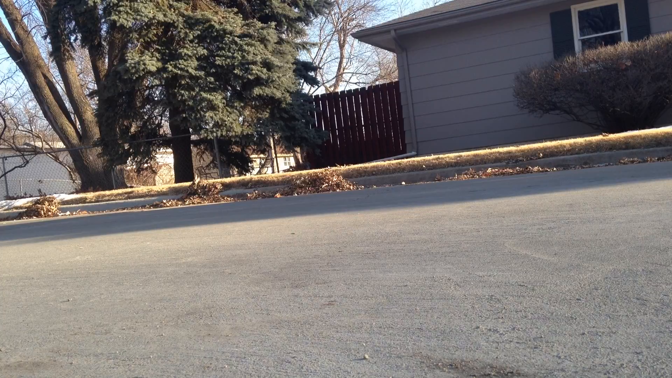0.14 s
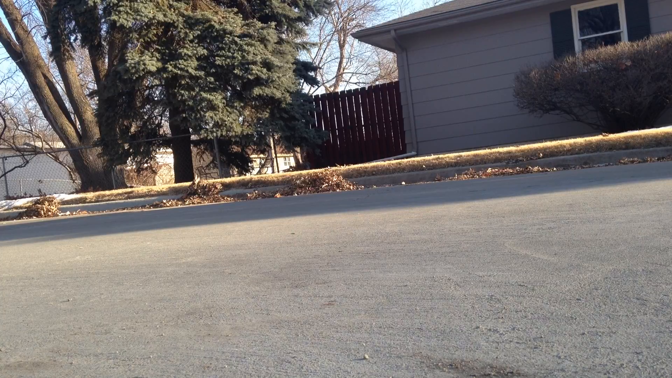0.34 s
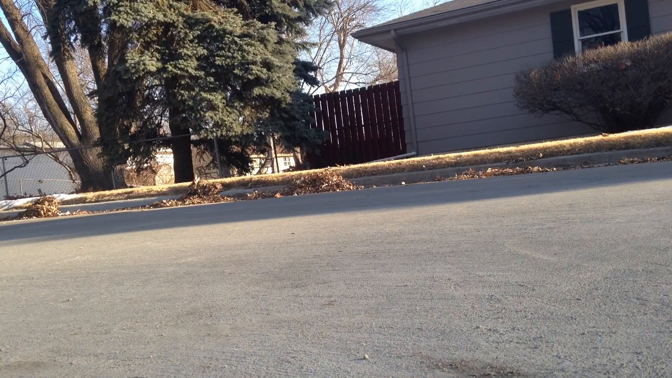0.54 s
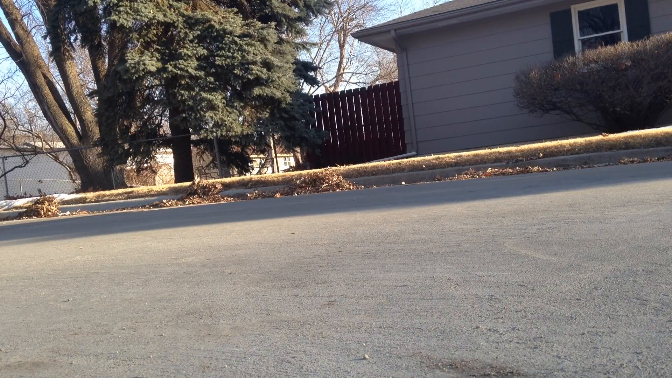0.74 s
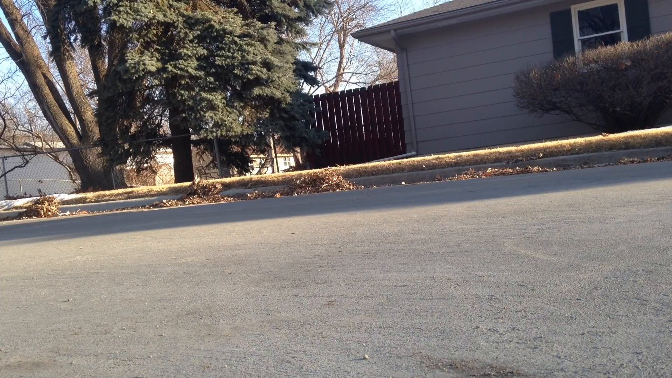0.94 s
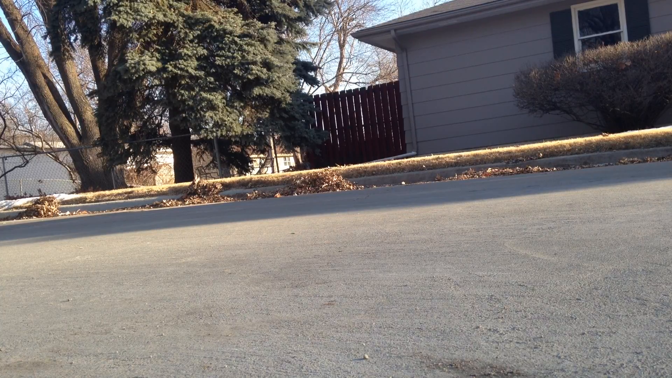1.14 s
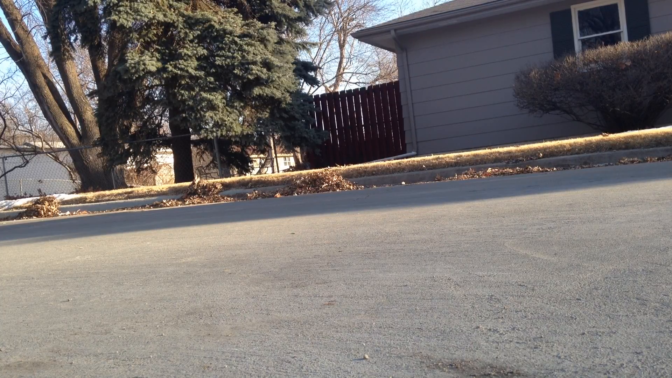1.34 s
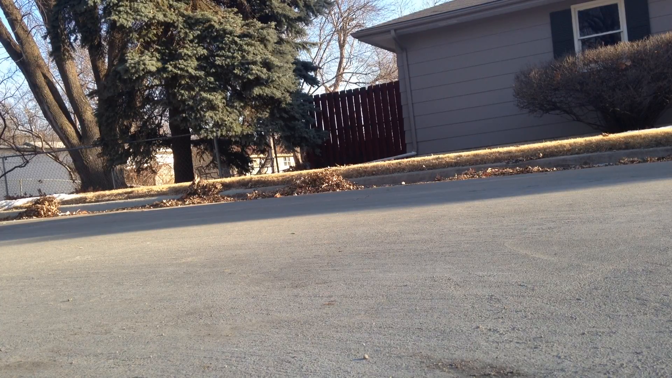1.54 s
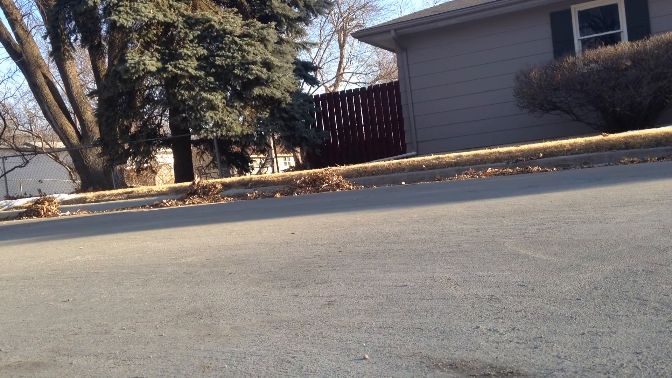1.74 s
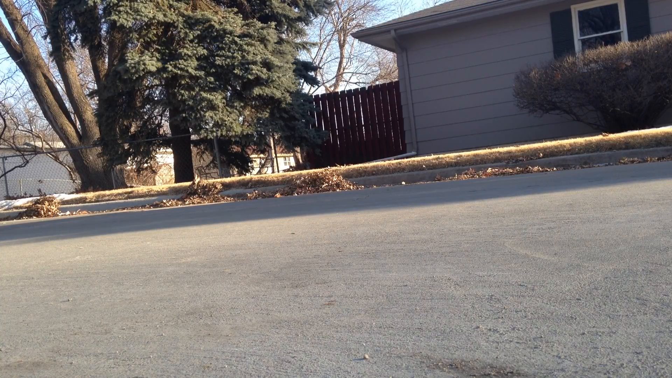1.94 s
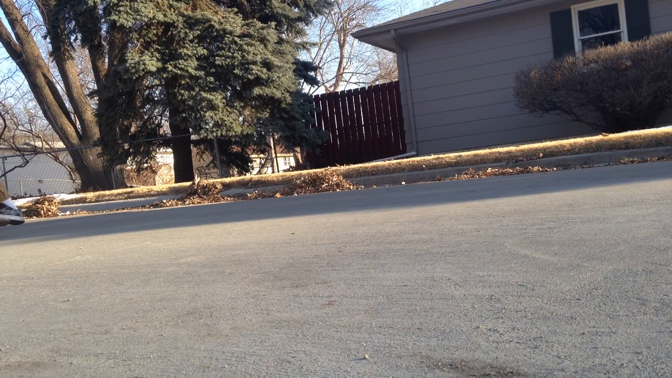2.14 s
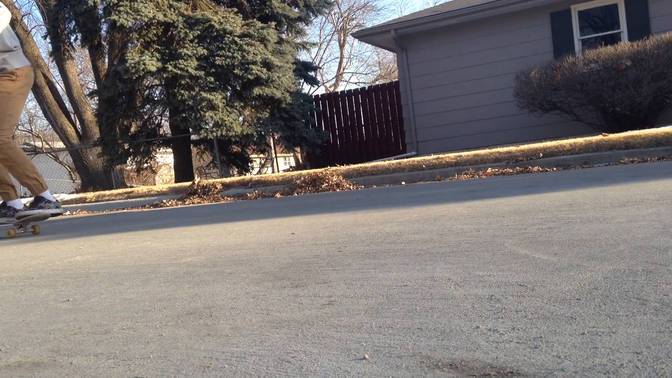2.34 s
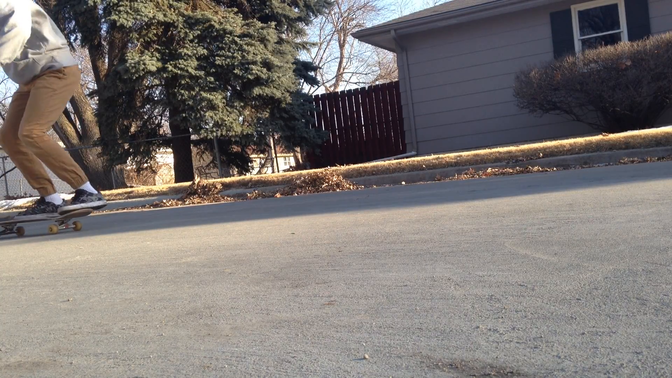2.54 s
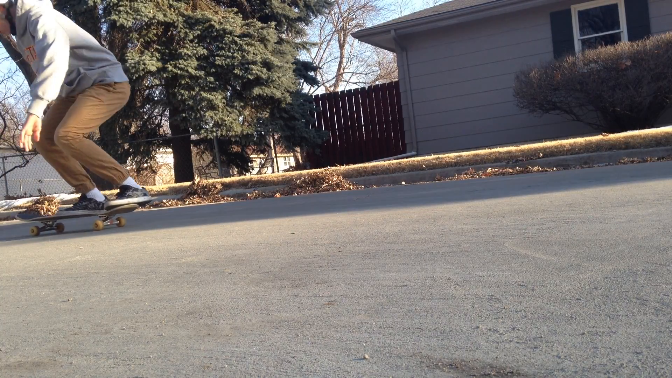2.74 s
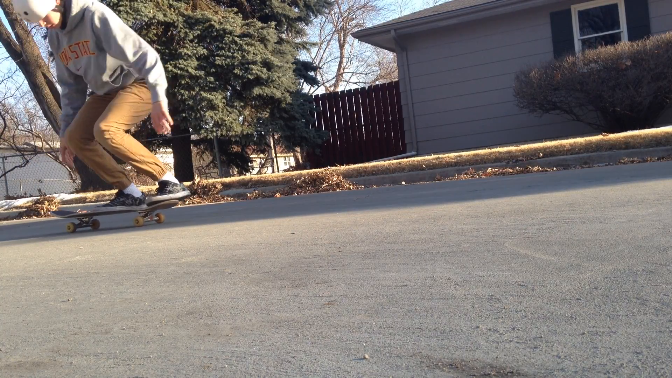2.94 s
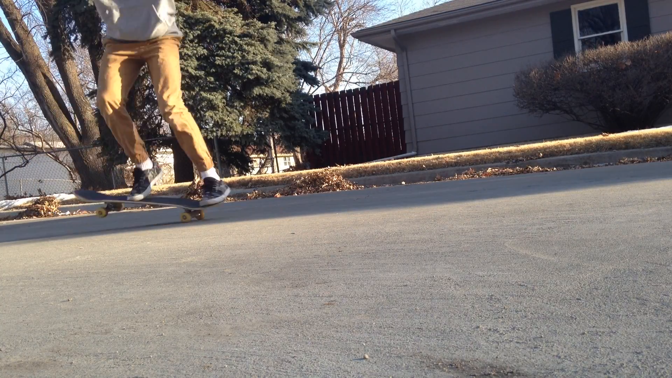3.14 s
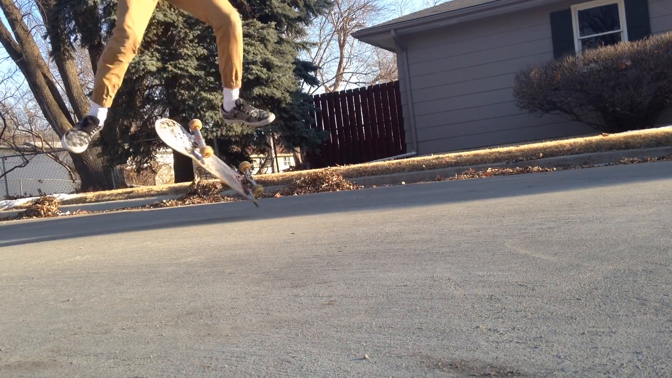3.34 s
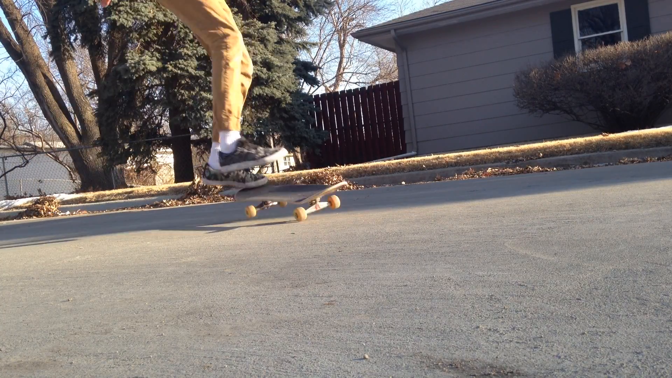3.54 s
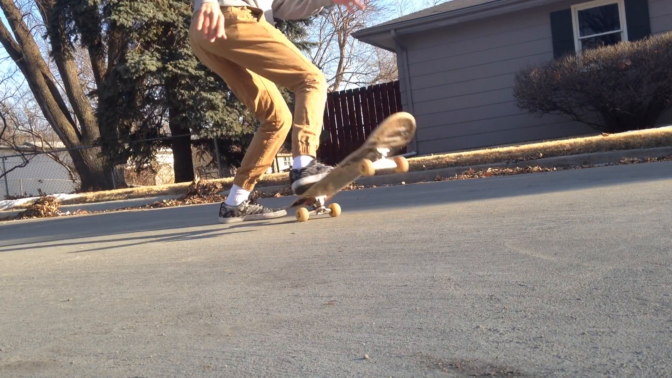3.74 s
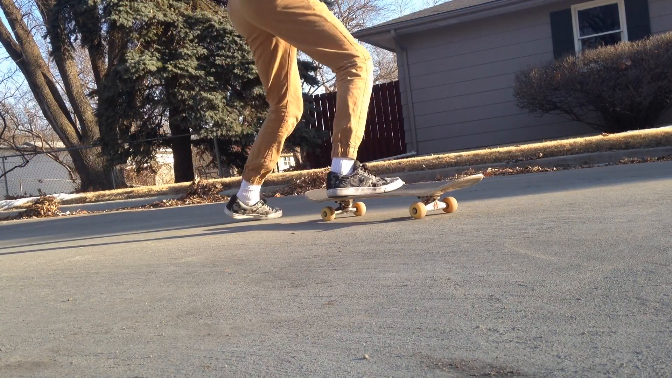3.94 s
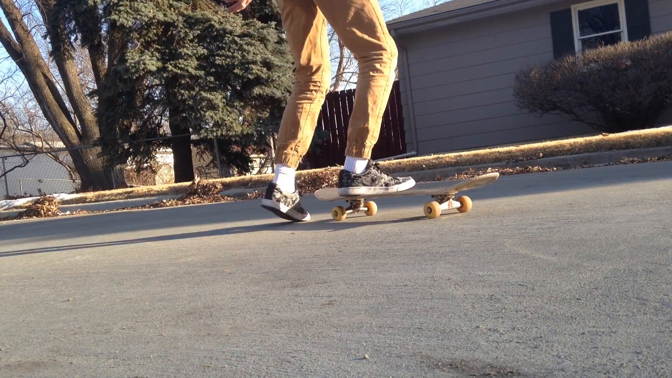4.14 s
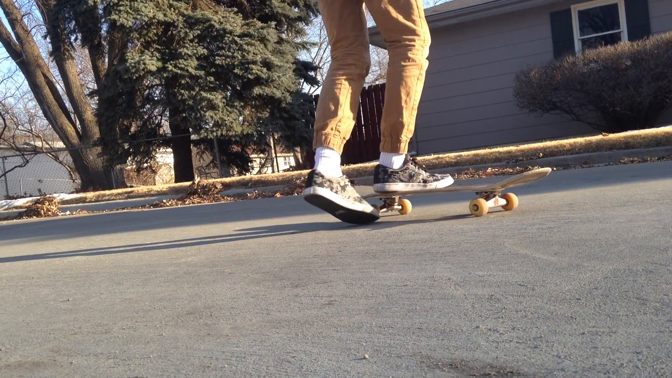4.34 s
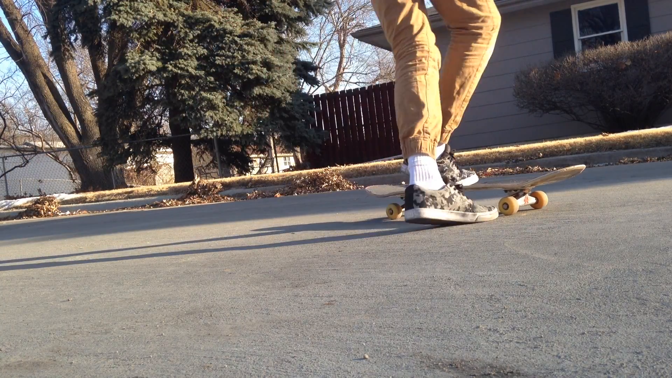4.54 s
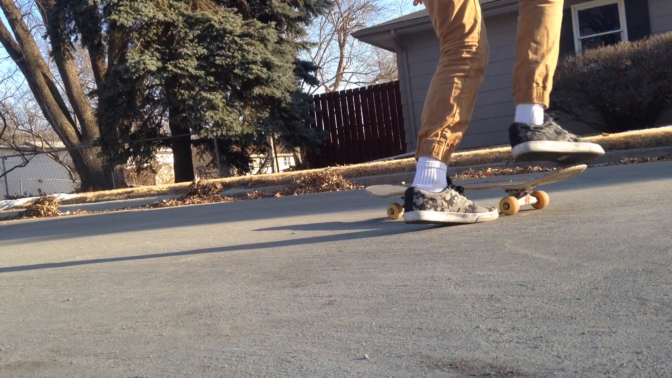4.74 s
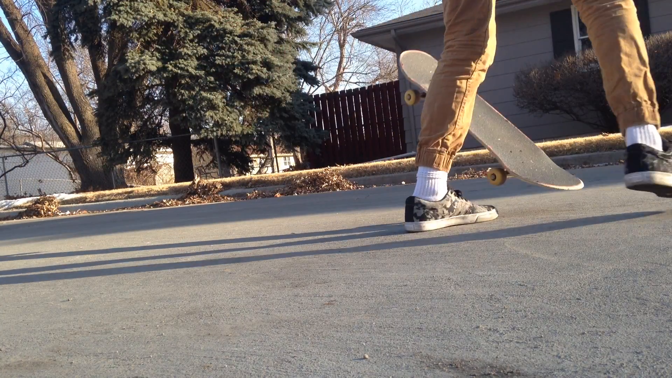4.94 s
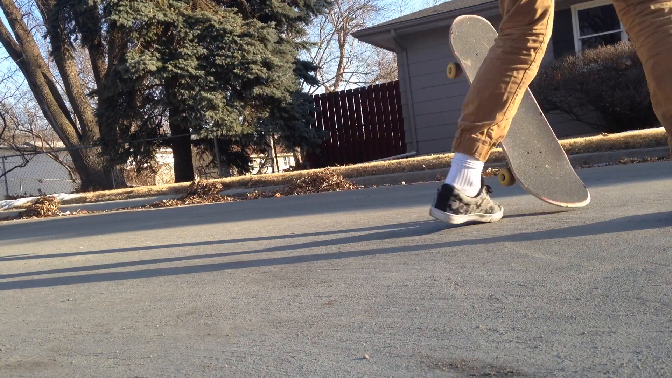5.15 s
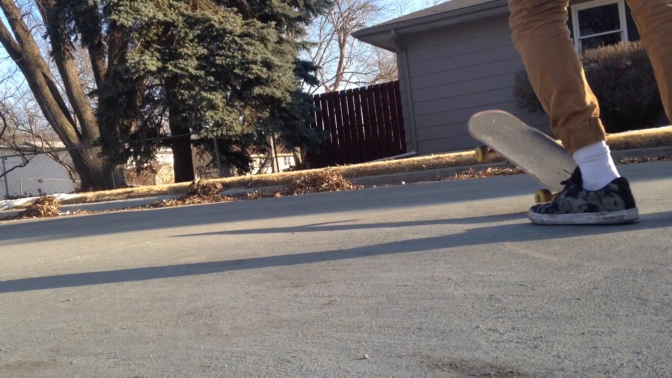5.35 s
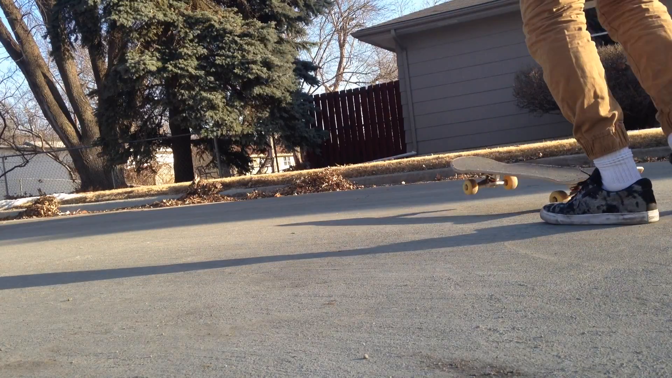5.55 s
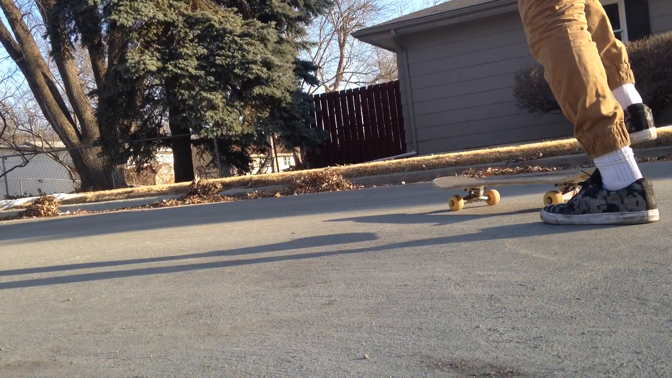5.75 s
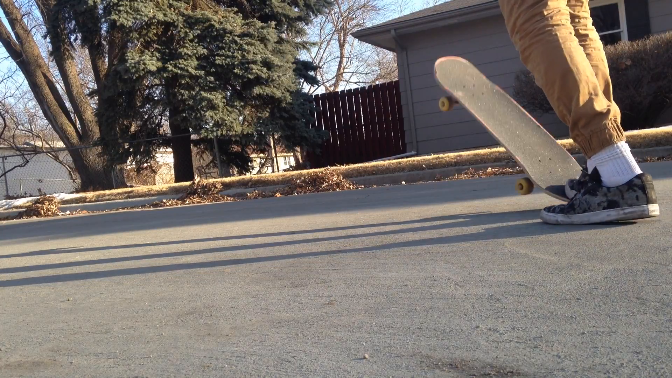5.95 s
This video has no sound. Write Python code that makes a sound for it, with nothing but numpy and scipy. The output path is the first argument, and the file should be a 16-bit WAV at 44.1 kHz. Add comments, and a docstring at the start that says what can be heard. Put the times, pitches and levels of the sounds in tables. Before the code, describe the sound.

A quiet street with low distant traffic hum and faint air. At 0-0.5 s, soft wheel roll and shoes scuffing grit. From 0.5 to 1.1 s a skateboard's wooden tail drags harshly, with small knocks inside the scrape. Light scuffs and a dull knock around 1.5 s; at 1.94 s a firm hollow clack, then gentle rolling with gritty ticks, snapping brighter near 3 s. At 3.3 s a sharp double pop and scrape, a short gap, then very loud, cracking slaps at 3.6 and 3.85 s with metallic truck rattle and skidding. From 4 to 4.8 s it is much quieter: a sole slides with a rising hiss, grit snaps. At 4.82 and 4.94 s clacks resume, then strong irregular wooden hits and scrapes at 5.2, 5.4-5.5, 5.7 and 6 s, still scraping at the end. Faint short house echo; the loudest blows overload the close microphone.

```python
"""First comes the far hum of a quiet street, with a soft roll of wheels and shoes scuffing on grit.
Then a skateboard's tail is dragged; the board rolls in, pops, lands and is kicked about on asphalt.
Blows and scrapes ring the wooden deck and shake the metal trucks, while rolling drums its low tones.
Grit hisses and snaps, house fronts answer faintly, and the loudest blows overload the microphone."""
import sys
import numpy as np
from scipy import signal
from scipy.fft import rfft, irfft, next_fast_len
from scipy.io import wavfile
from scipy.ndimage import uniform_filter1d, map_coordinates

SR = 44100
rng = np.random.default_rng(int(sys.argv[2]) if len(sys.argv) > 2 else 0)


def digitize_waveform(pressure):
    """Quantize a signal to 16-bit integers and store it at the path in sys.argv[1].

    Rows of a 2-D input are taken as channels; values are limited to [-1, 1].
    """
    field = np.atleast_2d(pressure).T
    bounded = np.clip(field, -1, 1)
    quanta = np.round(bounded * 32767).astype(np.int16)
    wavfile.write(sys.argv[1], SR, quanta)


def boost_factor(decibels):
    """Convert a level in decibels to a linear amplitude factor."""
    exponent = np.asarray(decibels, float) / 20
    return 10 ** exponent


N = 268128
STEPS = np.arange(0, N / SR + .01, .001)  # times at which slow level and pitch curves are worked out [s]
SKID_RISE_S = 0.012036  # time a skid takes to swell by 20 dB


def unit(x):
    """Scales a sound to an average strength (rms) of 1."""
    return x / np.sqrt(np.mean(x ** 2) + 1e-20)


def along(points, hz):
    """Reads values between (frequency, value) points on a log frequency axis."""
    f, v = np.transpose(points)
    return np.interp(np.log(hz + 1), np.log(f + 1), v)


def curves(rows):
    """Draws one curve over STEPS for each column after the time."""
    s, *columns = np.transpose(rows)
    return [np.interp(STEPS, s, column) for column in columns]


def sampled(control):
    """Reads a slow curve at every sound sample."""
    return np.interp(np.arange(N) / SR, STEPS, control)


def wobble(rate):
    """Makes a smooth random curve with the given number of random points a second."""
    knots = rng.standard_normal(int(N * rate / SR) + 4)
    return map_coordinates(knots, [np.arange(N) * rate / SR])


def filtered(x, response):
    """Multiplies the frequencies of a sound by a complex response."""
    m = next_fast_len(x.shape[-1] + 8192)
    spectrum = rfft(x, m) * response(np.fft.rfftfreq(m, 1 / SR))
    return irfft(spectrum, m)[..., :x.shape[-1]]


def coloured(x, spectrum):
    """Shapes a sound with a (frequency, level) spectrum and scales it to rms 1."""
    return unit(filtered(x, lambda hz: boost_factor(along(spectrum, hz))))


def modes(table):
    """Lets each mode (a tone a body rings at) answer a push, neighbours in opposite phase."""
    centre, width, db = np.transpose(table)[:, :, None]
    sign = (-1.) ** np.arange(len(table))[:, None]
    return lambda f: sign * boost_factor(db) * 1j * f * width / (centre * centre - f * f + 1j * f * width)


def grains(rate, spread_db, smooth):
    """Stones met at random moments, a few of them larger, on a share of smooth rubbing noise."""
    met = rng.random(N) < rate / SR
    size_db = spread_db * np.minimum(rng.exponential(size=N), 2.5)
    hits = met * boost_factor(size_db) * rng.uniform(-0.9581, 1, N)
    return unit(hits) + smooth * rng.standard_normal(N)


def patchy(x, depth_db):
    """The colour shifts in random patches of time and pitch as the contact changes."""
    z = signal.stft(x, nperseg=256)[2]
    field = uniform_filter1d(rng.standard_normal(z.shape), 6, 0)  # smooth over pitch
    field = uniform_filter1d(field, 14, 1)  # smooth over time
    return unit(signal.istft(z * boost_factor(depth_db * unit(field)), nperseg=256)[1][:N])


def stroke(s, db, rise_s, fall_s):
    """Level in dB of one sound that swells to a peak and dies away, 20 dB in each given time."""
    late = STEPS - s
    return db - 20 * np.where(late < 0, -late / abs(rise_s), late / abs(fall_s))


def together(parts):
    """Joint gain of (level, pitch) parts, and their pitch, led by the loudest."""
    power = [boost_factor(2 * db) for db, hz in parts]
    total = sum(power) + 1e-20
    pitch = sum(p * hz for p, (db, hz) in zip(power, parts)) / total
    return sampled(np.sqrt(total)), sampled(pitch)


# far hum before its random swell: (time [s], level [dB])
STREET = [(0.0, -39.5), (0.49, -41), (0.8, -37.5), (1.57, -42), (1.81, -40), (3.12, -41.5), (3.57, -39),
          (3.71, -40), (3.88, -61.5), (4.11, -51), (5.3, -44.5), (6.08, -41.5)]
# colour of the far traffic: (frequency [Hz], relative level [dB])
HUM = [(15, -59), (25, -22), (56, -7.5), (129, -0.5), (248, -5.5), (375, -25.5), (425, -41.5), (500, -39.5),
       (650, -53.5), (1100, -120)]
# colour of the still air: (frequency [Hz], relative level [dB])
AIR = [(180, -36), (300, -1), (674, 1.5), (745, 0.5), (893, -6.5), (2570, -21.5), (14100, -30),
       (15600, -27.5)]


def street():
    """Distant traffic is low noise that swells slowly; the still air is a steady, fainter noise."""
    swell_db = 1.3 * wobble(8)
    hum = boost_factor(sampled(curves(STREET)[0]) + swell_db) * coloured(rng.standard_normal(N), HUM)
    air = boost_factor(-51) * coloured(rng.standard_normal(N), AIR)
    return hum + air


# wheels rolling on the road: (time [s], level [dB])
RIDE = [(0.0, -45.5), (0.5, -44), (0.72, -35), (0.9, -39), (1.05, -32), (1.13, -48.5), (1.92, -49),
        (1.99, -38), (2.126, -43.5), (2.524, -40.5), (2.724, -35.5), (2.93, -43.5), (3.1, -47),
        (3.25, -40.5), (3.5, -51.5), (4.0, -58.5), (4.36, -53), (4.81, -71), (6.08, -62.5)]
# a foot weighs on the deck and drums it; the signs of the two durations are ignored:
# (peak time [s], level [dB], time to rise 20 dB [s], time to fall 20 dB [s])
STOMPS = [(3.305, -24, 0.0473, 0.2005), (3.79, -25.5, 0.1945, 0.0729), (3.938, -29, -0.0109, 0.0117),
          (5.78, -46.5, -0.0078, -0.0068)]


def drumming():
    """Wheels, skids and feet together set how strongly the deck bends."""
    # the low drumming of a skid is 6.5 dB under its scrape and lasts a little longer
    skids = [stroke(s, db - 6.5, SKID_RISE_S, 1.1737 * fall) for s, db, fall, hz, hiss_db in SKIDS]
    stomps = [stroke(*row) for row in STOMPS]
    return sampled(np.sqrt(sum(boost_factor(2 * db) for db in curves(RIDE) + skids + stomps)))


def ridden(db, follows, hz):
    """A background contact: its level at a -45 dB ride, the dB gained per dB of ride, its pitch."""
    return db + follows * (curves(RIDE)[0] + 45), hz


# tones the free wooden deck rings at: (frequency [Hz], width [Hz], relative level [dB])
DECK = [(224.26, 89.24, -8), (322.34, 37.205, 1), (499.08, 102.4, -1), (767.03, 145.06, 3),
        (958.5, 161.45, 1.5), (1070, 59.785, 4), (1230, 177.31, -0.5), (1499.1, 136.38, 3),
        (1710, 104.1, 4.5), (1886, 143.69, 4.5), (2180.5, 410.66, -1), (2970, 930, -16)]
BEND_HZ = 620  # modes below this bend the whole deck


def roll():
    """The coarse road shakes the soft wheels, which drum the bending modes of the loaded deck."""
    # the load damps the deck: wider modes die sooner
    damped = [(hz, 2.0 * width, db) for hz, width, db in DECK if hz < BEND_HZ]
    stones = grains(500, spread_db=7.5, smooth=1.0017)
    soft = filtered(stones, lambda hz: 1 / (1 + 1j * hz / 900) ** 2)  # soft wheels pass little treble
    lumps_db = 1.8 * wobble(18)
    return drumming() * boost_factor(lumps_db) * unit(filtered(soft, modes(damped)).sum(0))


# soles scuffing on grit; the signs of the two durations are ignored:
# (peak time [s], level [dB], time to rise 20 dB [s], time to fall 20 dB [s], strongest pitch [Hz])
SCUFFS = [(0.044, -50.5, -2.1078, 0.156, 4174), (0.222, -55.5, -1.3251, 1.0091, 4810),
          (1.02, -42.5, 0.5454, 0.0638, 4980), (1.226, -49.5, 0.2715, 0.6084, 5252),
          (1.382, -52.5, 1.09, 0.6593, 3546), (1.72, -48, 0.1232, -0.2946, 5473),
          (1.914, -36, 0.0442, 0.0982, 3568), (2.0, -44, 0.0957, 0.1775, 4947),
          (2.16, -47, 0.278, 0.3331, 5383), (2.51, -48.5, 0.198, 0.1342, 4632),
          (2.74, -46, 0.1582, 0.1835, 4298), (3.15, -41.5, 0.0476, 0.2372, 4669),
          (3.21, -35.5, 0.084, 0.0336, 5074), (3.25, -42, 0.0385, 0.0802, 6015),
          (3.311, -27, -0.0058, 0.0901, 5036), (3.723, -19.5, -0.0063, -0.0293, 3264),
          (4.057, -45, 0.1007, -0.2089, 7541), (4.54, -52, 0.14, 0.1943, 4499),
          (4.995, -37.5, 0.0998, -0.0814, 3305), (5.3, -49, 0.235, 0.7122, 3903),
          (5.438, -34.5, 0.087, 0.1614, 4604), (5.96, -50, -0.3266, -1.2, 3797),
          (6.028, -40.5, 0.1418, -2.0369, 4282), (6.075, -47, -0.0222, -0.54, 3500)]
# one sole slides slowly along the road: (time [s], level [dB], strongest pitch [Hz])
SLIDE = [(4.04, -89, 3400), (4.095, -50, 3400), (4.17, -46.5, 3926), (4.24, -41, 5113), (4.3, -43.5, 6452),
         (4.35, -50.5, 7540), (4.435, -56, 7495), (4.455, -69.5, 7500), (4.5, -90.5, 6500)]


def hiss_parts():
    """Soles, rolling and the dragged tail hiss on grit; skids add rattling metal, blows faint lead-ins."""
    rolling = ridden(-61.5, 0.45, 4497)
    drag = curves(DRAG)[0] - 22.5, 4000  # hiss under the scrape of the tail [dB], its pitch [Hz]
    # skids add a dull hiss of rattling wheels and trucks
    skids = [(stroke(s, db + hiss_db, SKID_RISE_S, fall), 3735) for s, db, fall, hz, hiss_db in SKIDS]
    # a faint hiss swells just before each blow, 45 dB under it
    lead_ins = [(stroke(s, db - 45, .015, SKID_RISE_S), 3700) for s, db, *_ in BLOWS]
    scuffs = [(stroke(*row[:4]), row[4]) for row in SCUFFS]
    return [rolling, drag, curves(SLIDE)] + skids + lead_ins + scuffs


# colour of the hiss before its moving pitch shapes it: (frequency [Hz], relative level [dB])
GRIT = [(1290, -25.5), (2200, -1), (3540, -0.5), (4310, -9.5), (4670, -6.5), (5160, -9.5), (6490, -1.5),
        (14700, -11), (15600, -17.5)]


def scuff():
    """Rubber slides over fine grit: a crackling hiss, strongest at the pitch of the gap under the sole."""
    loud, gap_hz = together(hiss_parts())
    grit = grains(2500, spread_db=3, smooth=.8) * boost_factor(1.6 * wobble(60))
    hiss = patchy(coloured(grit, GRIT), depth_db=1.3)
    hz, t, z = signal.stft(hiss, SR, nperseg=256)
    octaves = np.log2((hz[:, None] + 1) / np.interp(t, np.arange(N) / SR, gap_hz))
    gain = .8 + np.exp(-(octaves / .3) ** 2)
    gain /= np.sqrt(1 + (2 ** octaves / 2.822) ** 4)  # duller above 2.822 times the gap's pitch
    level = np.sqrt(np.mean(np.abs(z) ** 2, axis=1, keepdims=True))
    # the gap colours the hiss, not its loudness
    gain /= np.linalg.norm(gain * level, axis=0) / np.linalg.norm(level)
    return loud * signal.istft(z * gain, SR, nperseg=256)[1][:N]


# short scrapes of wood; the signs of the two durations are ignored:
# (peak time [s], level [dB], time to rise 20 dB [s], time to fall 20 dB [s], centre pitch [Hz])
SCRAPES = [(0.246, -40.5, 0.2934, 0.4125, 1179), (0.51, -46, 0.04, 0.3734, 1158),
           (1.336, -38, 0.2603, 0.2458, 1277), (1.74, -46, 0.3447, 0.0275, 886.6),
           (1.93, -33.5, 0.0898, 0.1551, 1255), (2.07, -44, 0.1331, 0.6821, 888.8),
           (3.19, -40.5, -0.0456, 0.1905, 786), (3.392, -19.5, 0.1089, 0.0288, 973),
           (3.454, -22, 0.035, 0.065, 1377), (3.722, -21, -0.0452, 0.0661, 1064),
           (3.931, -23, -0.0367, 0.0352, 1048), (6.034, -22, -0.0217, -0.2195, 1262)]
# the long drag of the tail: (time [s], level [dB], centre of the excited modes [Hz])
DRAG = [(0.5, -76.5, 1500), (0.538, -31.5, 1367), (0.638, -34, 1554), (0.65, -30, 1705), (0.69, -29, 1591),
        (0.808, -19.5, 1070), (0.845, -32, 1215), (0.968, -24.5, 1202), (1.026, -23.5, 1230),
        (1.12, -56.5, 1270), (1.18, -91.5, 1270)]
# the board skids on after a blow; the sign of the duration is ignored:
# (peak time [s], level [dB], time to fall 20 dB [s], centre pitch [Hz], hiss level over the scrape [dB])
SKIDS = [(3.31, -19.5, 0.1322, 937, -16.5), (3.644, -24.5, 0.0814, 1010, -5.5),
         (3.739, -34.5, 0.1602, 1025, -12.5), (3.87, -43.5, 0.1854, 1058, 1),
         (4.834, -42, 0.272, 1190, -19.5), (4.95, -22.5, 0.1365, 1272, -13.5),
         (5.05, -31.5, 0.108, 1027, -10.5), (5.209, -17, 0.2015, 1220, -25), (5.4, -25, 0.1631, 1260, -11),
         (5.51, -33, 0.3355, 1156, -6.5), (5.63, -34, 0.1154, 1357, -2.5), (5.714, -28.5, 0.0805, 1476, -4),
         (5.79, -28.5, 0.1133, 1337, -11), (5.905, -39.5, -0.0189, 1330, -10),
         (5.994, -25.5, 0.1516, 1266, -13.5), (6.049, -26, 0.2273, 1230, -26)]


def wood_parts():
    """Rattling rolls, the dragged tail, skids, short scrapes and faint lead-ins to blows sound the wood."""
    rattle = ridden(-51, 0.3066, 901)
    skids = [(stroke(s, db, SKID_RISE_S, fall), hz) for s, db, fall, hz, hiss_db in SKIDS]
    # a faint woody noise swells just before each blow, 33.5 dB under it
    lead_ins = [(stroke(s, db - 33.5, .015, SKID_RISE_S), hz) for s, db, hz, *_ in BLOWS]
    scrapes = [(stroke(*row[:4]), row[4]) for row in SCRAPES]
    return [rattle, curves(DRAG)] + skids + lead_ins + scrapes


def favoured(centre_hz, rest, octaves):
    """The place of contact favours the deck modes around one pitch."""
    return rest + np.exp(-(np.log2(np.array(DECK)[:, :1] / centre_hz) / octaves) ** 2)


def scrape():
    """Stones pluck the upper deck modes, a little in clumps, and shake the trucks."""
    level, centre_hz = together(wood_parts())
    stones = grains(800, spread_db=4, smooth=.75) * boost_factor(1.4 * wobble(80))
    weight = favoured(centre_hz, .42, .4) * (np.array(DECK)[:, :1] > BEND_HZ)
    weight /= np.sqrt(np.mean(weight ** 2, axis=0))
    wood = unit((filtered(stones, modes(DECK)) * weight).sum(0))
    metal = unit(filtered(stones, modes(TRUCKS[1:4])).sum(0))
    return level * (wood + boost_factor(-25.5) * metal)


# grit snapping under wheel or sole: (time [s], peak level [dB], pitch [Hz])
SNAPS = [(0.467, -38.5, 2474), (0.4958, -30.5, 1885), (1.426, -35, 2675), (1.7485, -30.5, 2730),
         (2.093, -28.5, 2891), (2.117, -32.5, 6990), (2.128, -33, 4995), (2.233, -40.5, 8015),
         (2.844, -35.5, 2822), (2.9064, -30.5, 10140), (2.965, -19, 4285), (3, -22, 4000),
         (3.037, -31.5, 4982), (3.049, -27, 4761), (3.0665, -25.5, 3779), (3.1417, -32, 4810),
         (3.244, -38, 7780), (3.2622, -34.5, 3842), (3.661, -9.5, 3208), (3.6907, -20.5, 3650),
         (3.7677, -33.5, 2500), (3.964, -33, 3480), (3.9858, -31, 7000), (3.9962, -30, 7820),
         (4.3936, -23.5, 5880), (4.407, -21, 8390), (4.5124, -37, 3625), (4.8452, -31, 5626),
         (4.8956, -27.5, 4284), (5.086, -31, 8966), (5.647, -26.5, 3413), (5.8267, -25, 3165),
         (5.9175, -27.5, 5283)]


def snaps():
    """Each grain of grit breaks with a burst of a few milliseconds around its own pitch."""
    out, t = np.zeros(N + SR), np.arange(SR // 40) / SR
    for s, db, hz in SNAPS:
        burst = rng.standard_normal(len(t)) * np.exp(-t / 0.0019543)
        tones = [(hz, 0.5654 * hz, 0), (0.9103 * hz, 1.3797 * hz, -8)]
        snap = filtered(burst, modes(tones)).sum(0)
        out[round(s * SR):][:len(t)] += boost_factor(db) * snap / np.abs(snap).max()
    return out[:N]


# tones of the metal trucks (wheel axles): (frequency [Hz], width [Hz], relative level [dB])
TRUCKS = [(3068.6, 390, 2.5), (3542.5, 207.15, 10.5), (3529.2, 135.26, 9.5), (4090.8, 1001.1, 6.5),
          (5397.9, 3389, 2.5), (8797.4, 5147, -1.5)]
# blows and catches on the board: (time [s], peak level of the upper deck modes [dB], strongest modes [Hz],
# low bending level over it [dB], truck and crack level over it [dB], decay constant of the contact [s])
BLOWS = [(0.589, -19.5, 1906, -11, -19.5, 0.008947), (0.679, -9.5, 1831, -29.5, -35, 0.00819),
         (0.7, -13, 1666, -22, -38.5, 0.00573), (0.73, -15.5, 1989, -16.5, -35, 0.00691),
         (0.778, -14, 1008, -23.5, -18.5, 0.00589), (0.811, -14.5, 898.4, -50.5, -8, 0.001165),
         (0.94, -17, 977.6, -10, -4, 0.003467), (1.035, -15, 1173, -6, -6, 0.000763),
         (1.46, -26, 866, -1.5, -16, 0.009045), (1.936, -3, 788.5, -3.5, -13, 0.006569),
         (1.952, -15, 797.5, -3.5, -15.5, 0.00399), (2.296, -22, 777, -5.5, -7, 0.004076),
         (3.298, -4.5, 693.2, -4.5, -6, 0.005), (3.348, -5, 1051, -8, -16.5, 0.0029),
         (3.448, -29.5, 1710, -15, -40.5, 0.0062), (3.603, 7.5, 850, -3.5, -0.5, 0.003371),
         (3.618, -5, 594.5, -8.5, 6, 0.001214), (3.635, 3.5, 1222, -2, -9, 0.00297),
         (3.664, -11.5, 753, -1.5, -8, 0.00782), (3.725, -9, 1029, -9.5, -1.5, 0.0046),
         (3.853, 9.5, 989.7, -14, -8, 0.0027966), (3.919, -11.5, 1013, -7, -6.5, 0.005455),
         (4.051, -29, 840, -35.5, -31, 0.0048), (4.558, -31.5, 836.4, 9, -4, 0.001404),
         (4.577, -33.5, 1022, -25, -24, 0.0025), (4.818, -13.5, 812.1, 2.5, -1, 0.005412),
         (4.936, -3, 1141, -0.5, -6, 0.005723), (5.036, -15, 733, -8.5, 5, 0.003115),
         (5.088, -28, 785.7, 9, -27.5, 0.004577), (5.197, -3.5, 1102, 4, -21.5, 0.0047),
         (5.387, -1.5, 1476, 1, -31, 0.008751), (5.428, -7, 1277, -3, -18, 0.00436),
         (5.476, 1.5, 1049, -1, -4, 0.004937), (5.494, -10, 1403, 0, -2.5, 0.004668),
         (5.553, -14.5, 1230, -5.5, -6.5, 0.0084), (5.616, -10, 1378, -1.5, -1.5, 0.0049),
         (5.699, -0.5, 1809, -7.5, -6, 0.005376), (5.779, -14, 1685, -15.5, -6, 0.005148),
         (5.893, -16.5, 1221, -1.5, -3, 0.005372), (5.983, 2, 1531, -5, -2.5, 0.0030245),
         (6.035, -5.5, 1155, -3.5, 1.5, 0.00526)]


def top(x):
    """Scales a sound to a peak of 1."""
    return x / np.abs(x).max()


def blows():
    """A short rough contact rings the deck and rattles the trucks, every mode at a new strength."""
    out, t = np.zeros(N + SR), np.arange(SR // 8) / SR
    low = np.array(DECK)[:, :1] < BEND_HZ
    for s, db, hz, bend_db, crack_db, contact in BLOWS:
        rise = np.clip(t / (0.23263 * contact), 0, 1)  # a longer contact also builds up more slowly
        chatter = rng.standard_normal(len(t)) * np.exp(-t / contact) * rise
        touch = 0.80855 * np.exp(-((t - .0006) / 0.00016779) ** 2)  # one smooth push amid the bouncing
        push = chatter + touch
        wood = filtered(push, modes(DECK)) * boost_factor(rng.normal(0, 2, (len(DECK), 1)))
        metal = filtered(push, modes(TRUCKS)) * boost_factor(rng.normal(0, 2.498, (len(TRUCKS), 1)))
        edge_hz = 11000 * boost_factor(0.508 * db)  # harder blows crack brighter
        metal = filtered(metal, lambda f: 1 / (1 + 1j * f / edge_hz))
        clack = top((wood * ~low * favoured(hz, .45, .4)).sum(0))
        bend = boost_factor(bend_db) * top((wood * low).sum(0))
        crack = boost_factor(crack_db) * top(metal.sum(0))
        out[round(s * SR):][:len(t)] += boost_factor(db) * (clack + bend + crack)
    return out[:N]


# how long the echo takes to fall 60 dB: (frequency [Hz], time [s])
HOUSES = [(200, 0.11), (2000, 0.032), (10000, 0.023)]


def houses(x):
    """House fronts answer with a noisy echo; each frequency dies at its own speed."""
    hz, t, z = signal.stft(rng.standard_normal(SR // 3), SR, nperseg=256)
    fall = boost_factor(-60 * t / along(HOUSES, hz)[:, None])
    tail = signal.istft(z * fall, SR, nperseg=256)[1]
    delayed = np.pad(x, (400, 0))  # 400 samples, about 9 ms
    return signal.fftconvolve(delayed, tail / np.linalg.norm(tail))[:N]


def scene():
    """Adds the board, its faint echo, the hiss, the rolling and the street."""
    board = scrape() + snaps() + blows()
    return (street() + roll() + scuff() + board + boost_factor(-19.5) * houses(board))[None]


def band_limit(x):
    """A steep low-pass at the top of the band."""
    return signal.sosfilt(signal.butter(12, 15730, fs=SR, output="sos"), x)


def record(dry):
    """The microphone input overloads: peaks bend over smoothly towards full scale."""
    clipped = dry / (1 + np.abs(dry) ** 8) ** (1 / 8)
    return band_limit(clipped)


dry = scene()
out = record(dry)
digitize_waveform(out)
```